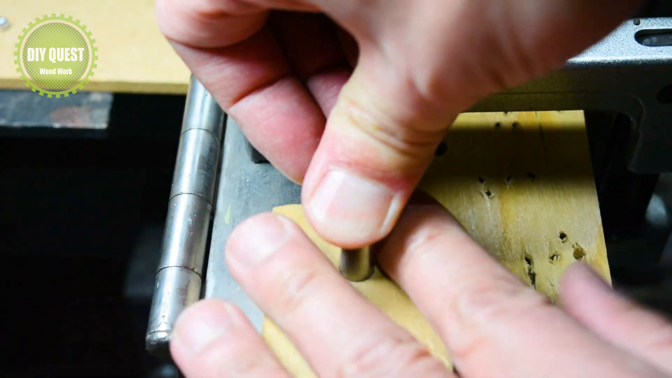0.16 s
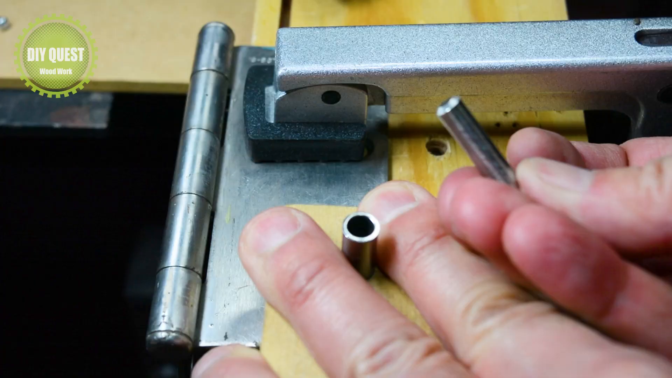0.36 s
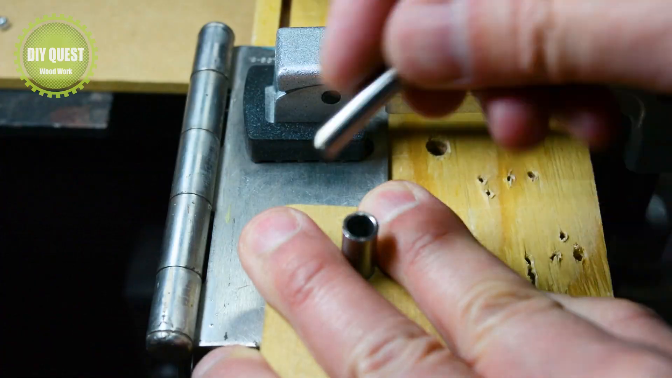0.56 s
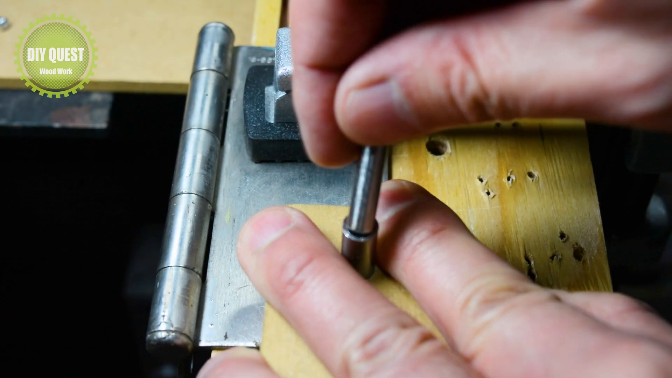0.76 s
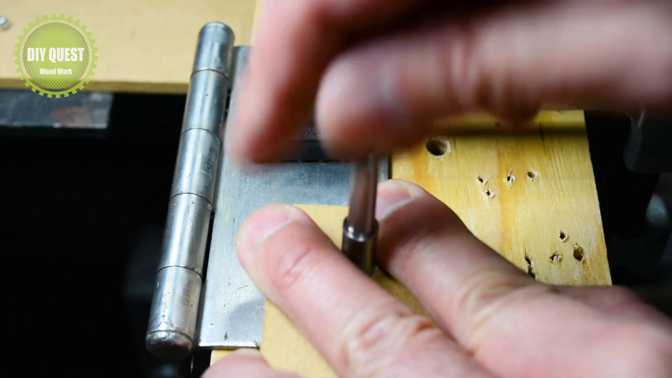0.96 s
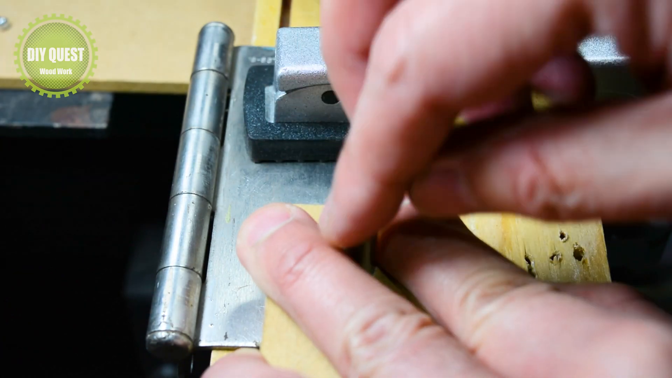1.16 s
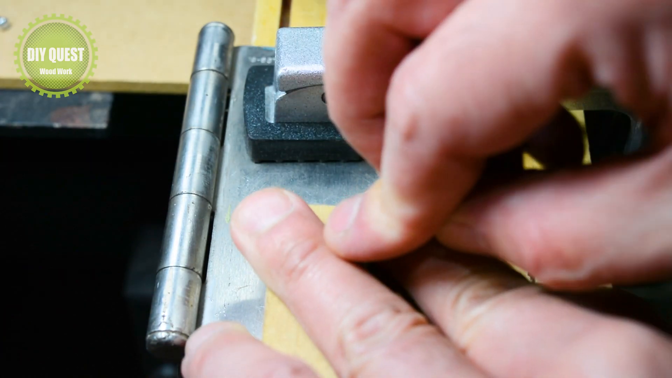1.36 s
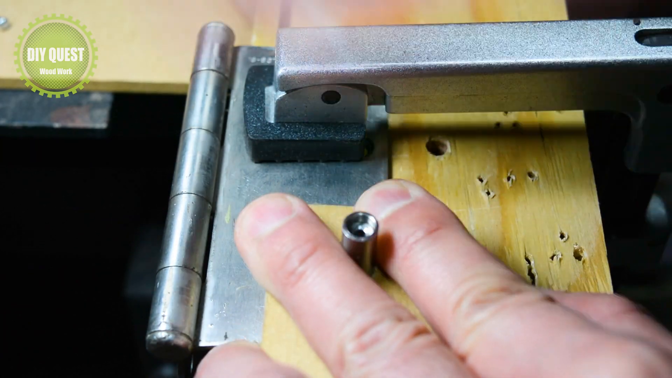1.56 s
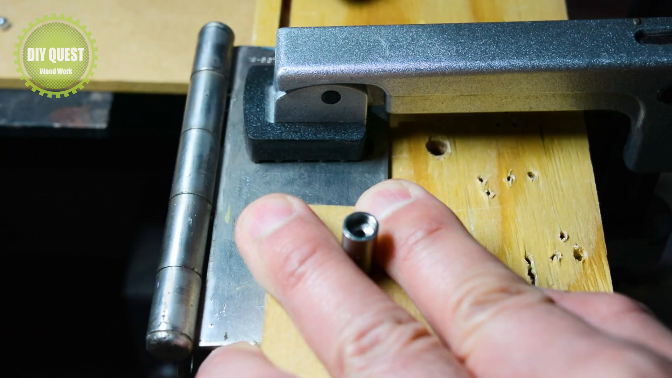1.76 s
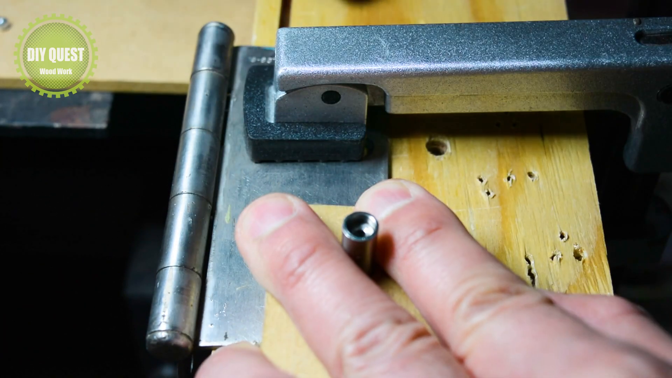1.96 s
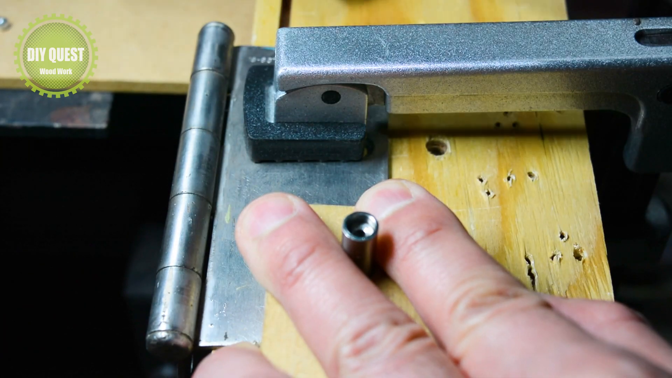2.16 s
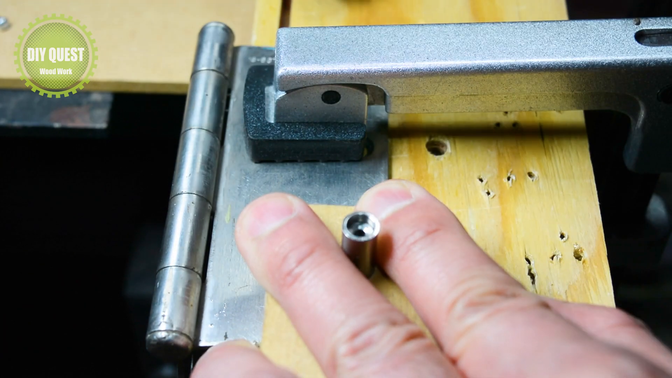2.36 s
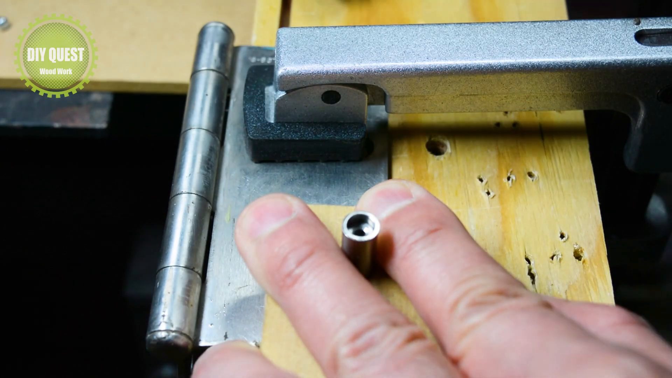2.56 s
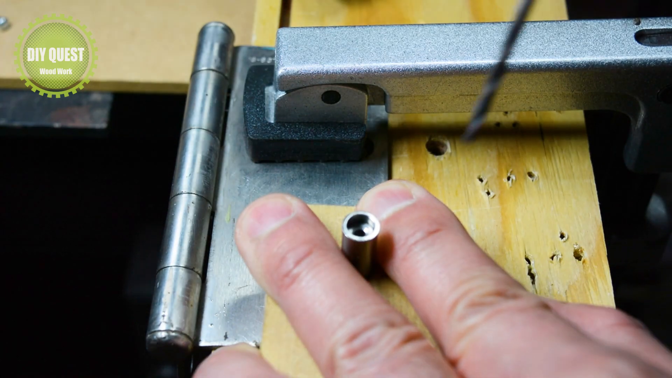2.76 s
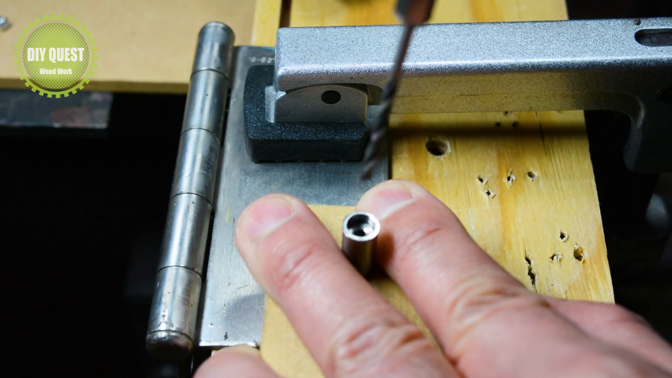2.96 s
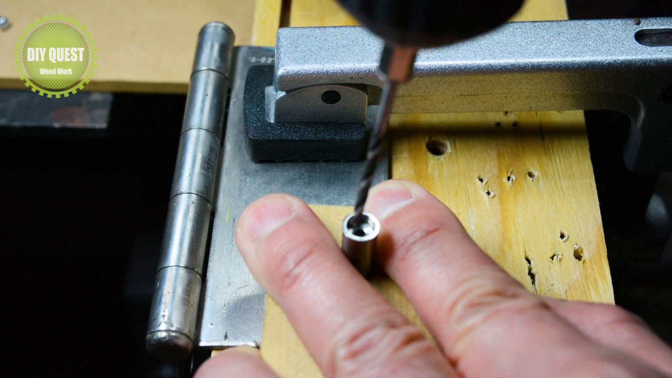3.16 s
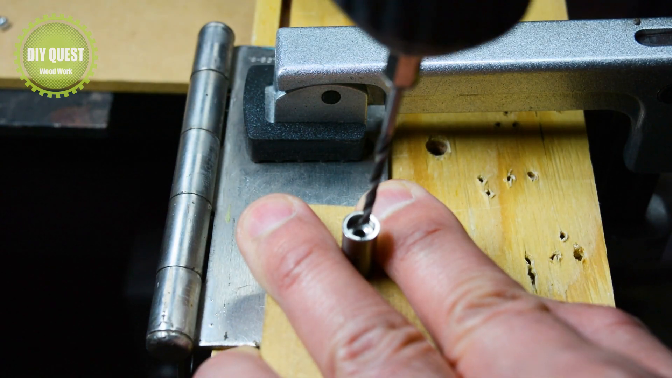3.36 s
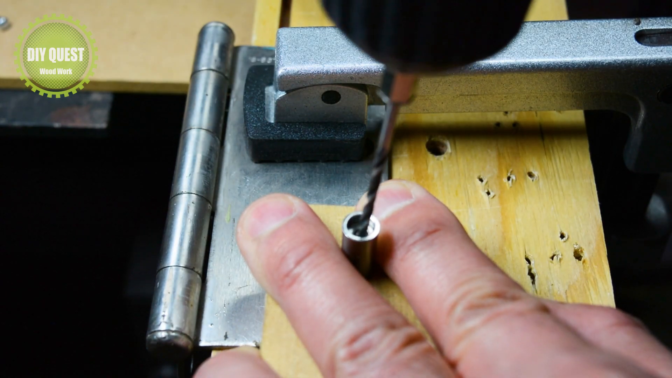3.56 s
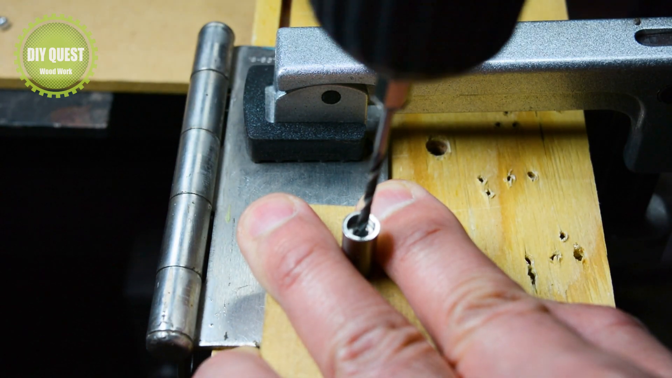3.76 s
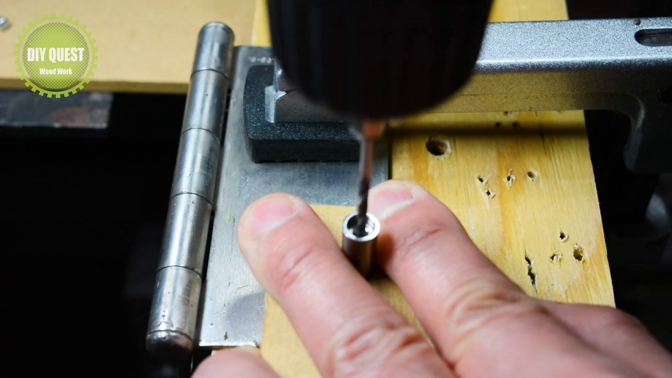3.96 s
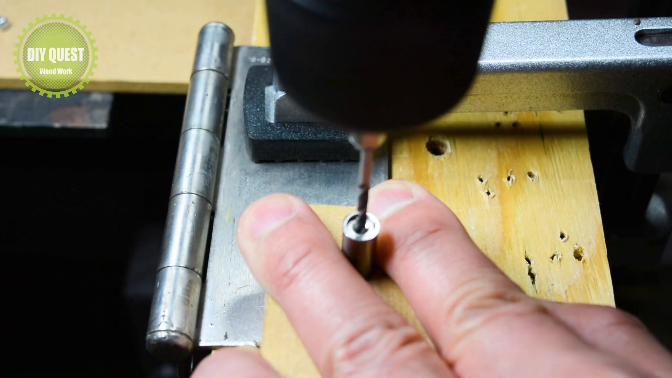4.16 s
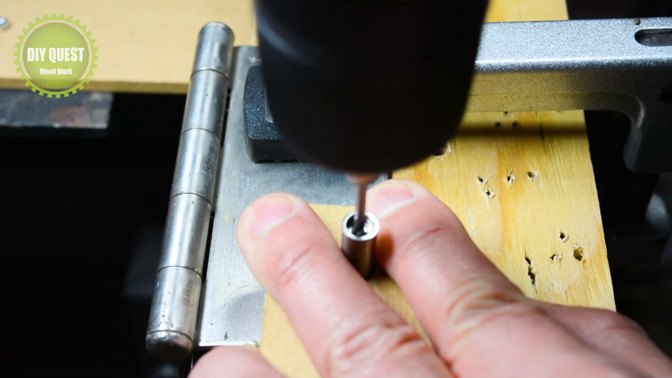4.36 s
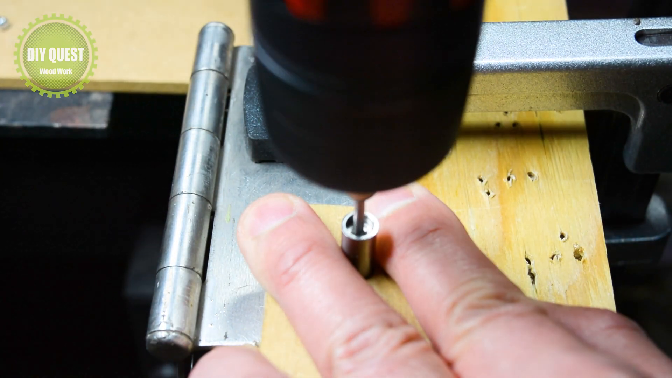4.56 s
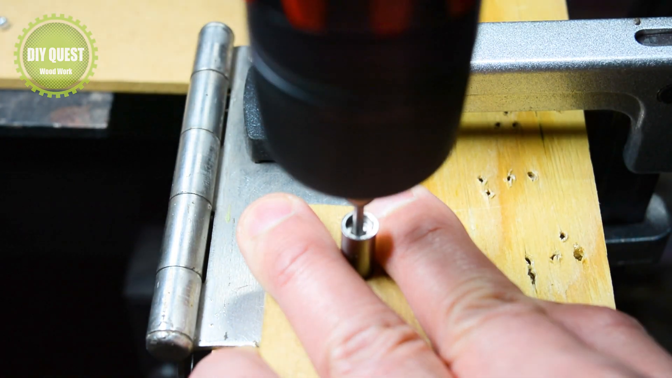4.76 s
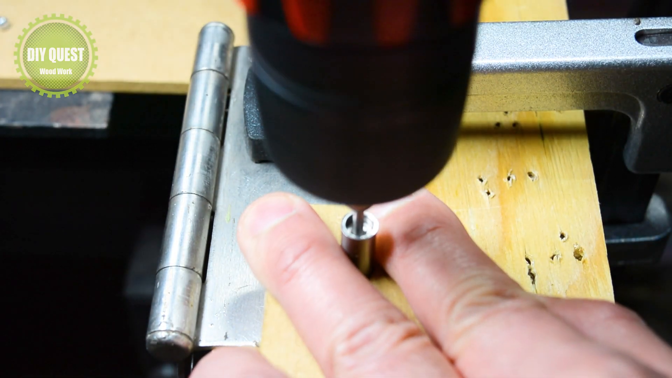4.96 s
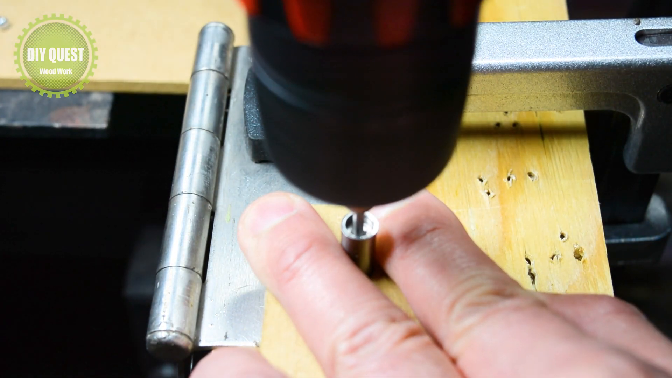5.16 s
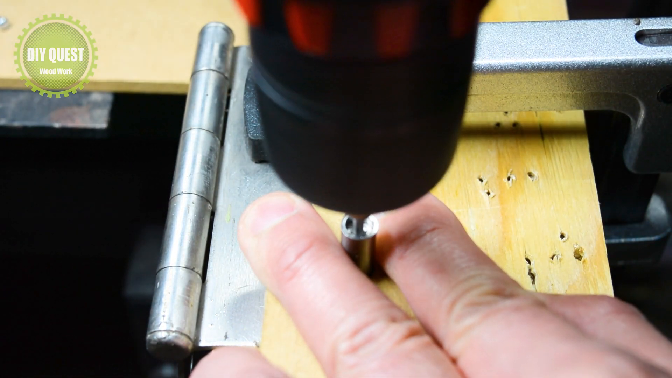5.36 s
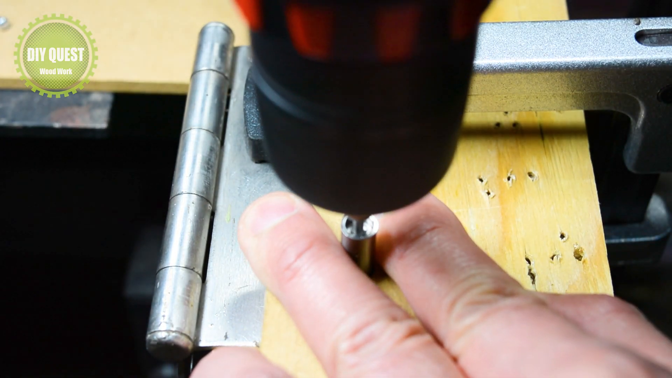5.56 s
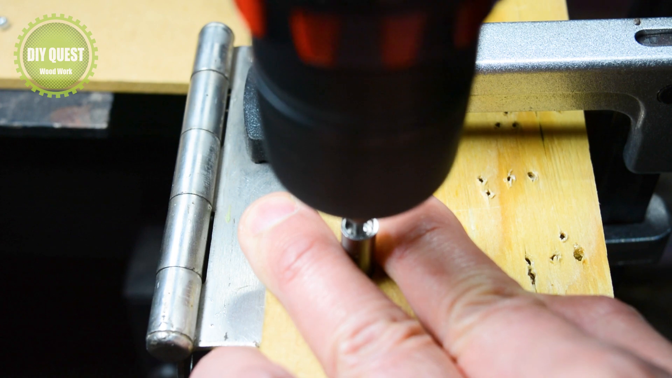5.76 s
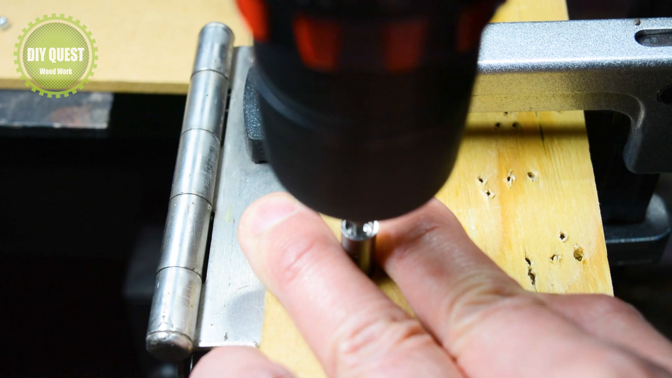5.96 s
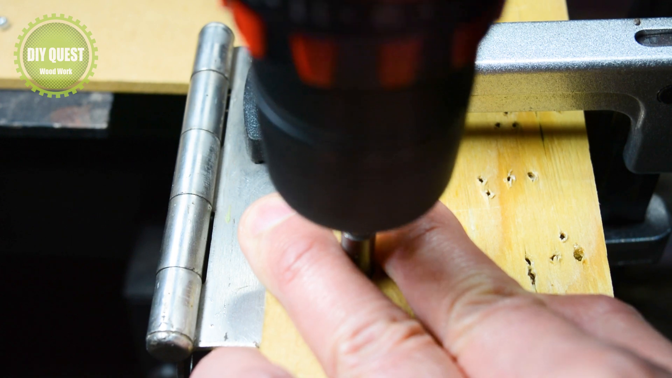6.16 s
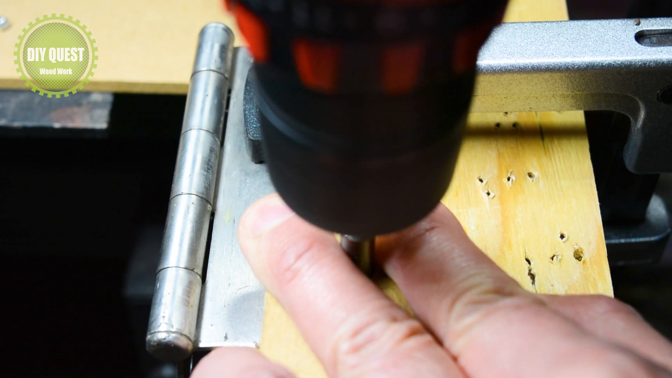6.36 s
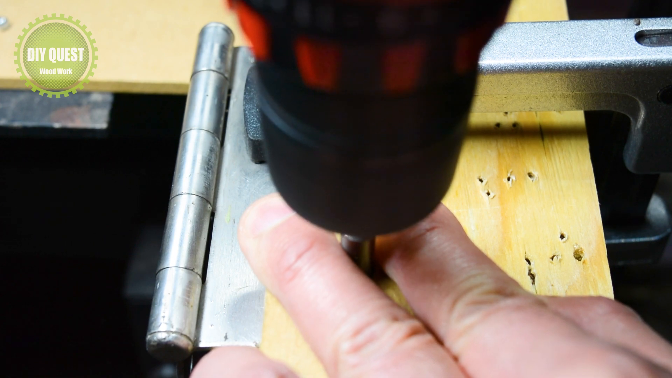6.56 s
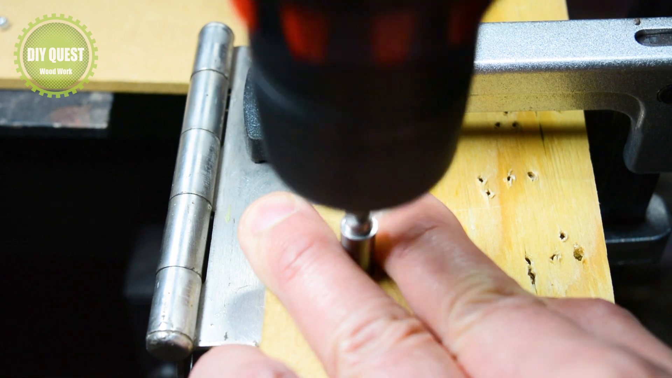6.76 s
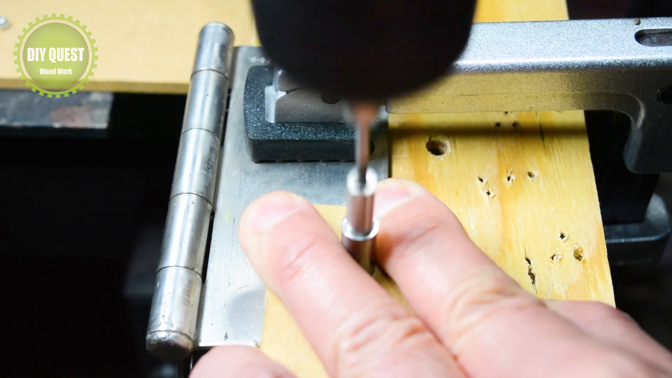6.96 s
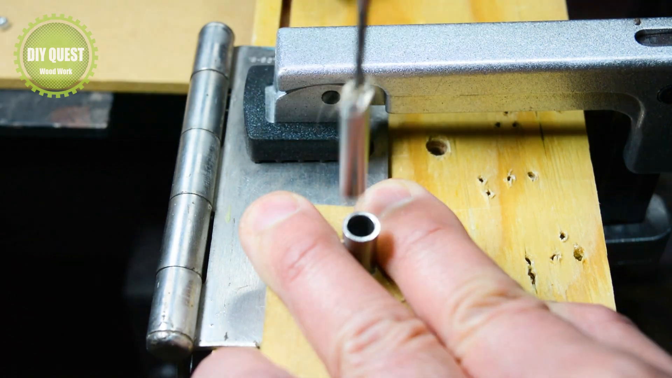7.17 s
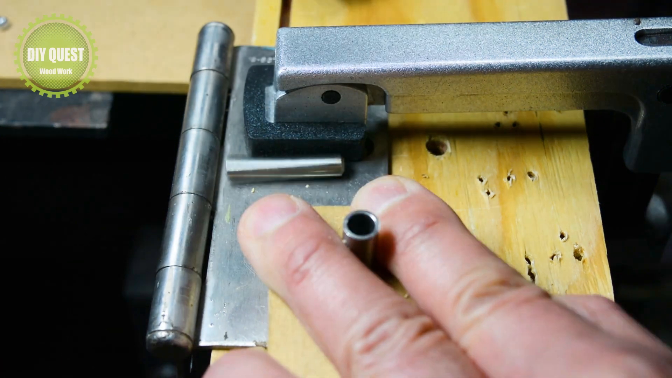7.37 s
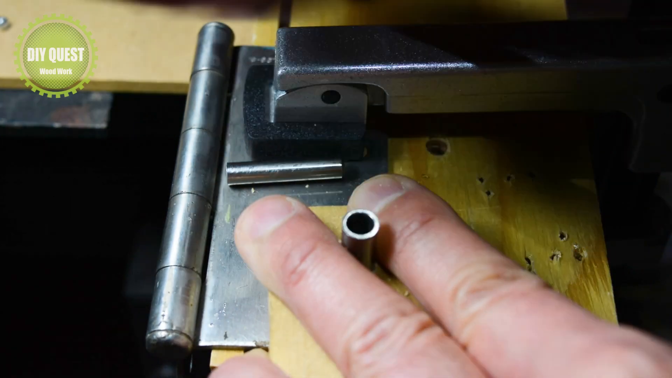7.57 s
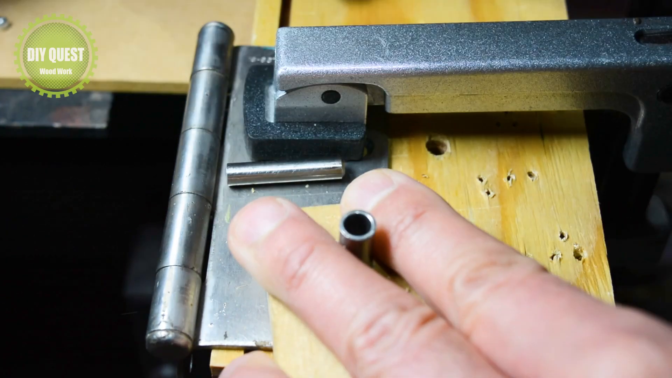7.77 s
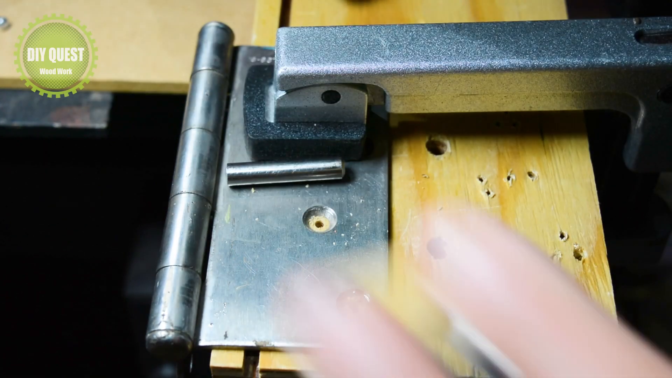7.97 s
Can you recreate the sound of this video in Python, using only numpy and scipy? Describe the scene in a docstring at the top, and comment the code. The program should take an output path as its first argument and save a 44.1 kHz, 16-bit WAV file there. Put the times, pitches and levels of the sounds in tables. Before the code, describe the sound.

Quiet handling noises come first: skin brushing, light steel scratching, one hard short metal knock and a few crisp ticks. Underneath lie low hiss, steady hum and a distant engine drone. Then an electric drill buzzes and stutters at low speed, races up to a bright, rushing whine, and glides down in pitch. Steel clatters twice during the slowdown, with a soft gust of air. Close, nearly mono, with short room echo.

```python
"""Soft rubs of skin come first, close to two microphone ports; hiss, a steady hum and low drones,
mostly a far engine's, lie under everything. A steel guide drops into a bushing on a hinge: each blow
excites damped modes of the steel. A mains drill creeps on a half-pressed trigger, runs up, bores a pilot
hole in wood and coasts down: one shaft angle drives gear and fan noise, brush rub, whistle and rotor tones.
The guide falls on the hinge and the fan's exhaust puffs at the microphone; a small workshop echoes."""
import sys
import numpy as np
from scipy import signal
from scipy.fft import rfft, irfft
from scipy.io import wavfile
from scipy.ndimage import uniform_filter1d

SR = 44100
rng = np.random.default_rng(int(sys.argv[2]) if len(sys.argv) > 2 else 0)


def dump_mix(stems):
    """Bounce the given channels to the path in sys.argv[1] as a 16-bit WAV at rate SR."""
    frames = np.atleast_2d(stems).T  # one column per channel
    limited = np.clip(frames, -1, 1)  # hard clip at full scale
    pcm = np.round(limited * 32767).astype(np.int16)
    wavfile.write(sys.argv[1], SR, pcm)


N = 357210  # samples
TIME = np.arange(N) / SR  # s
HZ = np.fft.rfftfreq(4096, 1 / SR)  # frequency grid of the filters


def amp(db):
    """Level law: 20 dB is a factor of ten in amplitude."""
    return 10 ** (np.asarray(db) / 20)


def unit(x):
    """Power normalisation: scales to rms 1."""
    return x / np.sqrt(np.mean(x ** 2) + 1e-20)


def read(points, hz=HZ):
    """Interpolation on a logarithmic frequency axis, flat beyond the ends."""
    f, value = np.transpose(points)
    return np.interp(np.log(hz + 1), np.log(f + 1), value)


def curves(rows):
    """Linear interpolation in time: one value a sample for each column."""
    s, *columns = np.transpose(rows)
    return [np.interp(TIME, s, column) for column in columns]


def bumps(peaks):
    """Resonance: each peak lifts the gain in dB along a bell over frequency."""
    return sum(db / (1 + (2 * (HZ - hz) / width) ** 2) for hz, width, db in peaks)


def colour(x, db, keep_power=True):
    """Minimum-phase filtering: a causal filter built from its gain in dB alone."""
    log_gain = np.log(amp(np.maximum(db, -100)))
    circle = np.concatenate([log_gain, log_gain[-2:0:-1]])
    taps = np.fft.ifft(np.exp(np.conj(signal.hilbert(circle)))).real
    if keep_power:  # white noise keeps its rms; only the shape of the gain counts
        taps = taps / np.linalg.norm(taps)
    return signal.oaconvolve(x, taps)[:len(x)]


def tilt(db_per_octave):
    """Spectral slope about 4 kHz, level below 500 Hz."""
    return db_per_octave * np.log2(np.maximum(HZ, 500) / 4000)


def wander(rate_hz):
    """Random modulation: low-passed noise of rms 1."""
    spectrum = rfft(rng.standard_normal(N))
    low_pass = 1 / (1 + (np.fft.rfftfreq(N, 1 / SR) / rate_hz) ** 4)
    return unit(irfft(spectrum * low_pass, N))


def add(mix, s, sound):
    """Superposition: adds a sound in place from its start time."""
    part = mix[max(round(s * SR), 0):][:len(sound)]
    part += sound[:len(part)]


def at_level(x, db):
    """Short-time level: sets the rms of the loudest two milliseconds."""
    return amp(db) * x / np.sqrt(uniform_filter1d(x ** 2, size=88).max())


def contact(length_s, grit=0.17):
    """Impact and friction: a sharp first touch, then a scrape that dies exponentially."""
    t = TIME[:SR // 8]
    length_ms = max(length_s * 1000, .1)
    scrape = rng.standard_normal(len(t)) * np.exp(-1000 * t / length_ms)
    return (t == 0) + grit * np.sqrt(length_ms) * scrape


# spectrum of the hiss: (frequency [Hz], relative density [dB per Hz])
HISS_SPECTRUM = [(20, -39), (64, -31), (120, -12), (340, -13), (450, -9.5), (600, -11.5), (1600, -15.5),
                 (2800, -16), (3300, -18.5), (8000, -23), (10600, -20), (12500, -19.5), (15500, -27.5)]


def hiss(rms_db=-68):
    """Stationary noise: white noise shaped by a fixed spectrum."""
    return amp(rms_db) * colour(rng.standard_normal(N), read(HISS_SPECTRUM))


# steady hum: (frequency [Hz], rms level [dB])
HUM_TONES = [(417, -68), (492, -80)]


def steady_hum():
    """Phase modulation: sines of constant level whose phase wanders by 0.16 rad rms."""
    out = np.zeros(N)
    phase = 0.16 * wander(6.8)
    for hz, db in HUM_TONES:
        out += amp(db) * np.sqrt(2) * np.sin(2 * np.pi * hz * TIME + phase)
    return out


# low drones, one row a point: a far engine, and near 4.8 s the drill motor's mains hum
# (time [s], mean fundamental [Hz], mean peak level of the fundamental [dB])
DRONE_COURSE = [(0, 75, -86), (.35, 66, -86), (.6, 100, -104), (1.15, 125, -82.5), (2.1, 156, -84),
                (2.5, 110, -85), (3.1, 114, -84), (3.7, 128, -80), (3.95, 133, -70.5), (4.5, 137, -77),
                (4.8, 101, -68.5), (5.3, 112, -88), (6.1, 113, -74), (6.7, 112, -63), (7.1, 113, -78),
                (7.7, 116, -76), (7.95, 150.4, -72.5), (8.1, 160, -69)]


def low_drones(second_db=-5):
    """Frequency modulation: a gliding fundamental and its second harmonic, both unsteady."""
    hz, db = curves(DRONE_COURSE)
    angle = 2 * np.pi * np.cumsum(hz * (1 + 0.017 * wander(17))) / SR
    harmonics = np.sin(angle) + amp(second_db) * np.sin(2 * angle)
    return amp(db + 2 * wander(5.1)) * harmonics


# skin and steel sliding on wood and metal; the narrowest bands sound almost like tones:
# (time [s], length [s], rms level before the fades [dB], centre [Hz], width [octaves])
RUB_STROKES = [(0, 0.052, -62, 470, 0.43), (0, .4, -71, 1370, 0.38), (0.058, 0.35, -69, 433, 0.32),
               (1.679, 0.047, -59, 1100, 0.92), (1.679, .06, -57.5, 11000, 1.3),
               (2.047, 0.36, -69.5, 2800, 0.44), (2.404, 0.093, -58, 13000, 1.8),
               (2.868, 0.18, -71, 6000, .7), (3.456, 0.13, -73, 8000, .7), (3.58, 0.67, -68, 2150, 1.2),
               (7.62, .36, -59.5, 5230, .015), (7.702, 0.14, -52, 8350, 0.036)]


def rubs():
    """Sliding friction: grainy noise, band-passed for each stroke and faded at both ends."""
    out = np.zeros(N)
    grains = rng.standard_normal(N) * amp(3.4 * wander(120))
    for s, length_s, db, hz, octaves in RUB_STROKES:
        stroke = grains[max(round(s * SR), 0):][:round(length_s * SR)]
        band = -20 * np.log10(1 + (np.log2((HZ + 1) / hz) / octaves) ** 2 / 2)
        fades = signal.windows.tukey(len(stroke), .35)
        add(out, s, amp(db) * unit(colour(stroke, band)) * fades)
    return out


# small dry ticks of fingers and tool:
# (time [s], level of the loudest 2 ms [dB], brightness [dB per octave], scrape decay time [s])
TICK_EVENTS = [(0.135, -54, -11, .002), (1.306, -57.5, 0.5, .002), (1.543, -57, 6, .001),
               (1.7, -45.5, -2.5, 0.0054), (1.723, -44.5, -3, 0.0013), (2.0359, -54, 10, 0.0011),
               (2.103, -58, 1, .003), (2.434, -40, 6.5, 0.0019), (2.465, -42.5, 7, 0.0032),
               (2.5143, -48.5, 5.5, 0.0017), (2.601, -55.5, 3.5, 0.0058), (2.636, -52.5, 7, .003),
               (2.6595, -54, 5, .001), (2.6882, -33.5, 7, 0.00082), (2.695, -53, -9, .002),
               (2.713, -60, -8, .004), (7.575, -30, 11, .0005), (7.989, -47.5, -10.5, 0.0041)]
# their common spectrum before the brightness: (frequency [Hz], relative density [dB per Hz])
TICK_SPECTRUM = [(100, -12.5), (400, 2.5), (1500, 4.5), (5000, -4), (10000, -14), (16000, -20.5)]


def ticks():
    """Non-resonant impact: a touch and its scrape, shaped by a broad spectrum."""
    out = np.zeros(N)
    for s, db, bright, length_s in TICK_EVENTS:
        tick = colour(contact(length_s), read(TICK_SPECTRUM) + tilt(bright))
        add(out, s, at_level(tick, db))
    return out


# modes of guide and hinge: (frequency [Hz], initial level [dB], 60 dB decay time [s])
STEEL_MODES = [(1150, -12, 0.018), (1940, -10, 0.012), (2440, -2.5, 0.014), (2820, -3, 0.012),
               (3000, -9.5, 0.013), (3670, -4, 0.012), (3980, -5, 0.015), (4370, -11, 0.021),
               (4970, -6.5, .018), (5700, -4.5, 0.008), (6420, -6, 0.008), (7560, -15, 0.015),
               (8650, -7, 0.0097), (10270, -13.5, 0.0098)]
# steel on steel, from the guide and the jolting chuck: (time [s], level of the loudest 2 ms [dB],
# brightness [dB per octave], scrape decay time [s], top of the blow's spectrum [Hz])
STEEL_BLOWS = [(0.7053, -35, 6, 0.0024, 15000), (.749, -41, 2.5, 0.0048, 15000),
               (0.7531, -37, 4, 0.0057, 15000), (.784, -45.5, 1, 0.0076, 14000),
               (0.87, -41, 0.5, 0.0042, 15000), (0.877, -48, 0, 0.0035, 15000),
               (0.9145, -48, 3.5, 0.0065, 15000), (.9952, -50, 6, 0.0039, 13000),
               (1.001, -50, 5, .007, 13000), (1.019, -46, 10, 0.02, 12000),
               (1.0303, -17, 2.5, 0.00052, 8000), (1.0538, -32.5, 1.5, 0.00028, 7000),
               (1.0645, -47, 1, 0.00081, 7000), (4.0498, -39.5, 1.5, .003, 15000),
               (4.0787, -34, 2, 0.0012, 11000), (4.0886, -39, 0, .001, 11000),
               (4.0986, -36, 7, 0.00084, 11000), (4.1086, -46, 7, .001, 11000),
               (4.318, -46, -1, .0006, 11000), (7.3063, -16, 5.5, 0.0014, 12000),
               (7.3411, -19.5, 6.5, 0.00084, 15000)]


def steel_taps(crack=2.2):
    """Modal excitation: the guide seats, the chuck jolts and the guide falls, each ringing the steel modes."""
    t, out = TIME[:SR // 8], np.zeros(N)
    ring = crack * (t == 0)  # the direct crack of the blow
    for hz, db, t60 in STEEL_MODES:
        ring = ring + amp(db - 60 * t / t60) * np.cos(2 * np.pi * hz * t)
    ring = signal.sosfilt(signal.butter(2, 900, "high", fs=SR, output="sos"), ring)
    for s, db, bright, length_s, top_hz in STEEL_BLOWS:
        softness = -10 * np.log10(1 + (HZ / top_hz) ** 8)
        blow = signal.fftconvolve(contact(length_s), ring)[:len(t)]
        add(out, s, at_level(colour(blow, tilt(bright) + softness), db))
    return out


def tone(turns, multiple, waver):
    """Order tone: one multiple of shaft speed at rms 1; bearing play wavers its phase by waver rad rms."""
    return np.sqrt(2) * np.sin(2 * np.pi * multiple * turns + waver * wander(25))


def scuff(turns, speed, size=512, order=4):
    """Cyclic repetition: a worn track read once a turn gives a dense stack of lines that glides with speed."""
    track = signal.resample(rng.standard_normal(size), size * order)
    fine_turns = np.interp(np.arange(N * order) / order, np.arange(N), turns)
    played = np.interp(fine_turns % 1 * len(track), np.arange(len(track)), track)
    # make up the power lost above the audible band when the track runs fast
    return signal.resample_poly(played, 1, order) * np.sqrt(np.maximum(speed * size / SR, 1))


# phase-cut trigger: (time [s], strength of the mains buzz [0-1])
TRIGGER_CHOP = [(4.04, 1), (4.11, 0.6), (4.15, 0), (4.28, 0.3), (4.32, 0.4), (4.38, 0.4), (4.44, 0.25),
                (4.51, 0), (4.55, .6), (4.63, 0), (4.72, 0.27), (4.79, 0.3), (4.9, 0.15), (5.1, 0.03),
                (6.7, 0)]


def mains_kicks(mains_hz=50, buzz=6, spark_s=0.0016):
    """Phase-cut control: every half wave of the mains kicks the motor, at constant mean power."""
    chop, = curves(TRIGGER_CHOP)
    since_kick = (TIME - 4.0786) % (1 / (2 * mains_hz))
    kicks = 1 + buzz * chop * np.exp(-since_kick / spark_s)
    return kicks / np.sqrt(uniform_filter1d(kicks ** 2, size=441))


# spectrum of the whirr: (frequency [Hz], relative density [dB per Hz])
WHIRR_SPECTRUM = [(25, -66), (65, -53), (110, -25.5), (300, -26.5), (550, -21), (1000, -16), (1500, -14),
                  (2100, -3), (2700, 0), (3500, -4.5), (6500, 0.5), (8500, -2), (10500, -4), (13000, -4),
                  (16000, -6)]
# housing resonances: (frequency [Hz], width [Hz], lift [dB])
HOUSING_MODES = [(2820, 130, 3), (3083, 365, 7), (3715, 460, 5.5), (4166, 390, 4), (4570, 150, -1.5),
                 (5080, 870, 4.5), (7750, 130, 1.5), (9480, 140, -1.5)]


def gear_and_fan(turns, speed, repeats, kicks, flicker_db=0.34, roughness_db=1.0):
    """Noise through resonances: gear scuff and the fan's rush, coloured by the housing."""
    # fast random level changes roughen the rush of the fan
    rush_level = roughness_db * wander(2500) + flicker_db * wander(75)
    rush = unit(rng.standard_normal(N) * amp(rush_level))
    gears = np.sqrt(repeats / 2) * scuff(turns, speed) + np.sqrt(1 - repeats / 2) * rush
    return colour(gears * kicks, read(WHIRR_SPECTRUM) + bumps(HOUSING_MODES))


# spectrum of the brush rub: (frequency [Hz], relative density [dB per Hz])
BRUSH_SPECTRUM = [(200, -26.5), (1500, -8.5), (4000, -35), (6200, -12.5), (7500, -3), (9000, -3),
                  (10300, -3.5), (13000, -1.5), (16000, -32)]
# brush holder resonances: (frequency [Hz], width [Hz], lift [dB])
HOLDER_MODES = [(4860, 400, 3), (7050, 500, 5), (7650, 700, 9), (10100, 350, 3)]


def brush_rub(turns, speed, repeats, kicks):
    """Friction noise: a turn-by-turn scuff mixed with white noise, coloured by the brush holders."""
    rub = np.sqrt(repeats) * scuff(turns, speed)
    rub = rub + np.sqrt(1 - repeats) * rng.standard_normal(N)
    return colour(rub * kicks, read(BRUSH_SPECTRUM) + bumps(HOLDER_MODES))


# whistle of the 24 commutator bars, with side tones from the two poles:
# (multiple of shaft speed, level against the others [dB])
WHISTLE_ORDERS = [(24, -12), (46, -17), (48, -12), (50, -25), (70, -26), (72, -18), (94, -22), (96, -14),
                  (120, -19)]
# radiation of the whistle by the motor: (frequency [Hz], gain [dB])
MOTOR_RADIATION = [(1000, -35), (3000, -14), (3800, -4), (5500, -4), (7500, 1), (9000, 1), (12500, 0),
                   (15000, 4)]


def commutator_whistle(turns, speed, brush_level):
    """Bar passing: tones at bar-rate multiples follow the shaft, weighted by radiation."""
    whistle = np.zeros(N)
    for multiple, db in WHISTLE_ORDERS:
        hz = multiple * speed
        level = brush_level + db + read(MOTOR_RADIATION, hz) + 2 * wander(18) - 1
        below_nyquist = np.clip((SR / 2 - hz) / 4000, 0, 1)
        whistle += amp(level) * tone(turns, multiple, .8) * below_nyquist
    # a slow rotor only rubs; the whistle sets in with speed
    return whistle * np.minimum(speed / 160, 1) ** 1.5


# tones of rotor, gears and fan: (multiple of shaft speed, level against the whirr column at top speed [dB])
ROTOR_ORDERS = [(2, -25.5), (4, -26.5), (5.28, -30), (6, -24), (6.39, -28), (7.17, -24), (8, -22),
                (11, -22), (14, -25), (20, -21)]


def rotor_tones(turns, fast, whirr_level):
    """Order analysis: rotor, gears and fan sound at fixed multiples of shaft speed."""
    tones = sum(amp(db) * tone(turns, k, .06 * k) for k, db in ROTOR_ORDERS)
    return tones * fast ** 2 * amp(whirr_level + wander(8))


# motor shaft: (time [s], mean speed [turns per s])
SHAFT_SPEED = [(4.04, 5), (4.14, 70), (4.22, 72), (4.31, 56), (4.39, 98), (4.52, 76), (4.62, 118),
               (4.77, 100), (4.82, 172), (4.87, 210), (4.92, 262), (4.98, 312), (5.02, 336), (5.1, 359),
               (5.2, 370), (5.3, 375.8), (5.6, 377.4), (6.0, 376.5), (6.25, 373.2), (6.7, 370), (6.76, 349),
               (6.82, 325), (6.9, 296), (7.0, 263.5), (7.1, 232.5), (7.2, 204.5), (7.3, 178.5),
               (7.4, 152.6), (7.5, 127), (7.6, 103), (7.8, 60), (8.0, 20), (8.1, 3)]
# base levels, trimmed in drill(): (time [s], whirr of gears and fan [dB], rub of the brushes [dB])
DRILL_LEVELS = [(4.06, -57, -41), (4.085, -45, -40.5), (4.14, -48, -40.5), (4.22, -49.5, -41.5),
                (4.29, -53.5, -46), (4.35, -44, -39), (4.43, -47, -39), (4.51, -47, -41.5),
                (4.57, -43.5, -38), (4.68, -43, -37.5), (4.76, -45, -42), (4.88, -34, -30.5),
                (4.97, -28.5, -40), (5.15, -26, -29), (5.8, -25.5, -29.5), (6.4, -26, -25.5),
                (6.68, -25.5, -24.5), (6.92, -30, -33), (7.05, -32, -30), (7.2, -37.5, -31.5),
                (7.29, -38, -31.5), (7.37, -37.5, -28), (7.45, -38.5, -29), (7.56, -46.5, -37),
                (7.7, -48, -42.5), (7.95, -54.5, -52.5), (8.01, -59.5, -47), (8.1, -64, -76)]


def drill(whirr_db=2, brush_db=-2, flutter=0.00056, fan_mask_db=-7):
    """Kinematic coupling: one shaft angle drives whirr, brush rub, whistle and rotor tones."""
    speed, = curves(SHAFT_SPEED)
    whirr_level, brush_level = curves(DRILL_LEVELS)
    turns = np.cumsum(speed * (1 + flutter * wander(24.98))) / SR
    fast = speed / speed.max()
    # at low speed the rub repeats turn by turn; at full speed rushing air takes over
    repeats = .5 - .44 * fast  # share of power
    kicks = mains_kicks()
    whirr = gear_and_fan(turns, speed, repeats, kicks) * amp(whirr_level + whirr_db)
    rub_level = brush_level + brush_db + fan_mask_db * fast ** 2
    rub = brush_rub(turns, speed, repeats, kicks) * amp(rub_level)
    whistle = commutator_whistle(turns, speed, brush_level)
    tones = rotor_tones(turns, fast, whirr_level)
    onset = np.clip((TIME - 4.048) / 0.013, 0, 1)
    return (whirr + rub + whistle + tones) * onset


# puffs of air as the drill swings past: (time [s], length [s], level at full strength [dB])
PUFF_EVENTS = [(7.336, 0.0089, -51.5), (7.454, 0.0082, -53), (7.462, 0.0093, -37.5), (7.478, .019, -44),
               (7.499, 0.0236, -45), (7.533, 0.017, -60), (7.608, 0.032, -60)]
# their spectrum: (frequency [Hz], relative density [dB per Hz])
PUFF_SPECTRUM = [(25, -21), (70, 1), (320, 2.5), (550, -3), (900, -10), (2000, -55), (8000, -80)]


def puffs():
    """Turbulence: the fan's exhaust buffets the microphone as short bursts of low noise."""
    gust = np.zeros(N)
    for s, length_s, db in PUFF_EVENTS:
        add(gust, s, amp(db) * signal.windows.tukey(round(length_s * SR), .5))
    return colour(gust * rng.standard_normal(N), read(PUFF_SPECTRUM))


# decay of the room: (frequency [Hz], 60 dB decay time [s])
ROOM_DECAY = [(200, .25), (1000, 0.32), (3500, 0.18), (7000, 0.16), (15000, 0.074)]


def echoes(x, size=SR // 2):
    """Reverberation: sparse reflections from bench and walls, each band dying at its own speed."""
    t = TIME[:size]
    arrivals = (rng.random(size) < 4000 / SR) * (t > .003)  # about 4000 a second, after 3 ms
    walls = rng.choice([-1, 1], size) * arrivals
    hz, frame_s, bands = signal.stft(walls, SR, nperseg=256)
    decay = amp(-60 * frame_s / read(ROOM_DECAY, hz)[:, None])
    tail = signal.istft(bands * decay, SR, nperseg=256)[1]
    return signal.fftconvolve(x, tail / np.linalg.norm(tail))[:N]


# difference between the two microphone ports: (frequency [Hz], side against mid [dB])
PORT_WIDTH = [(60, -44), (500, -37), (1400, -38), (2800, -48), (4500, -38), (6000, -31), (9000, -32),
              (13000, -36)]


def scene(drill_wet_db=-15, knock_wet_db=-11):
    """Mid-side stereo: a shared mid, and a faint echoed side of opposite sign at the two ports."""
    background = hiss() + steady_hum() + low_drones()
    knocks = rubs() + ticks() + steel_taps()
    motor = drill()
    reflected = echoes(amp(drill_wet_db) * motor + amp(knock_wet_db) * knocks)
    mid = background + knocks + motor + reflected + puffs()
    side = colour(echoes(mid), read(PORT_WIDTH), keep_power=False)
    return np.array([mid + side, mid - side])


# microphone housing: (frequency [Hz], width [Hz], lift, negative for a notch [dB])
MIC_RESONANCES = [(10650, 500, 3), (11400, 650, -14), (13830, 300, -12)]


def record(dry, edge_hz=15860):
    """Transducer response: the microphone's housing shapes the treble, then a low-pass limits the band."""
    heard = np.array([colour(port, bumps(MIC_RESONANCES), keep_power=False) for port in dry])
    low_pass = signal.firwin(511, edge_hz, window=("kaiser", 9), fs=SR)
    return signal.oaconvolve(heard, low_pass[None], "same")


dry = scene()
out = record(dry)
dump_mix(out)
```